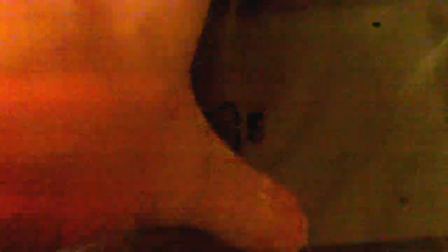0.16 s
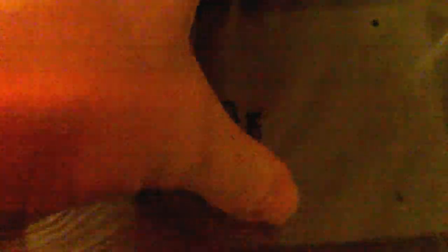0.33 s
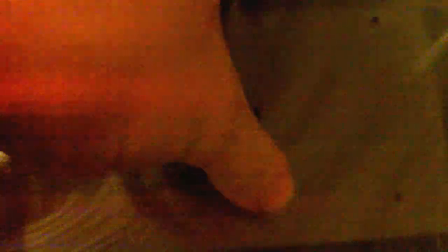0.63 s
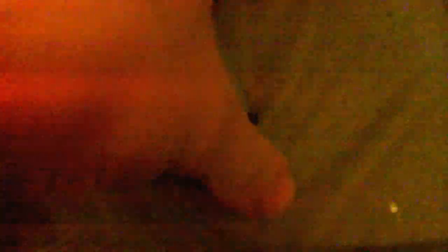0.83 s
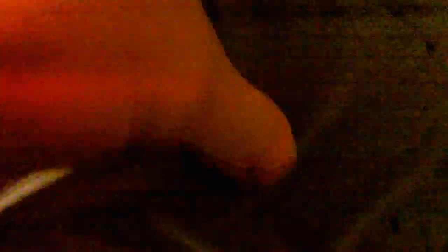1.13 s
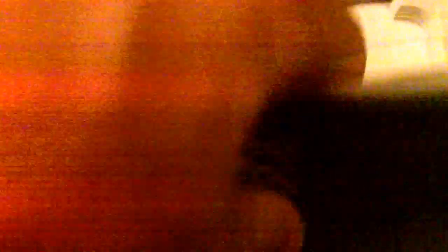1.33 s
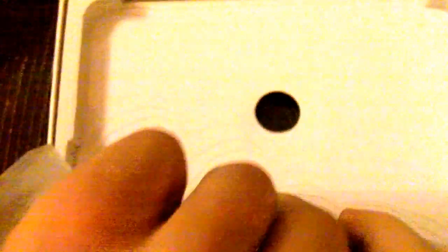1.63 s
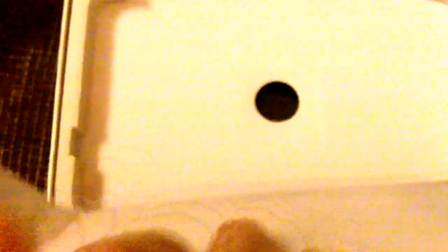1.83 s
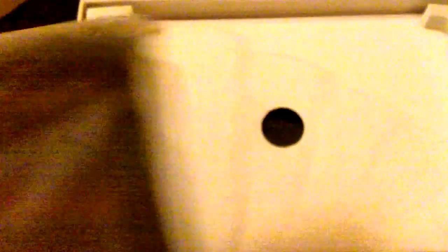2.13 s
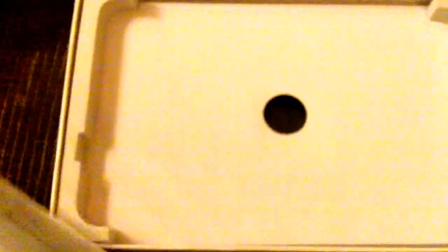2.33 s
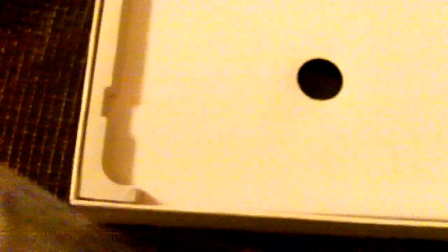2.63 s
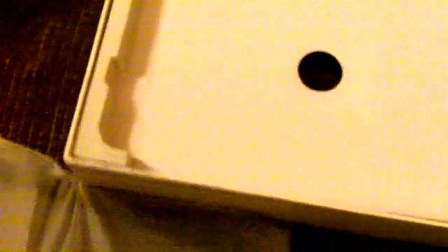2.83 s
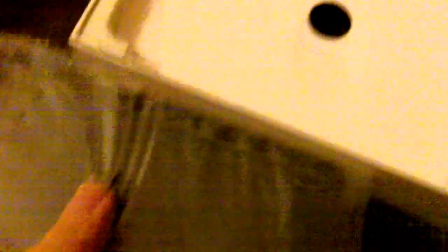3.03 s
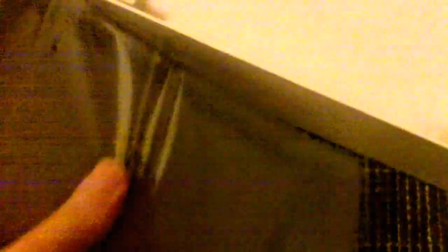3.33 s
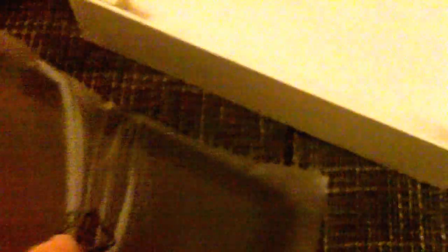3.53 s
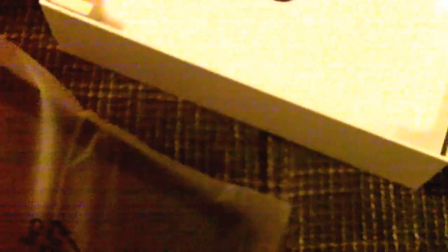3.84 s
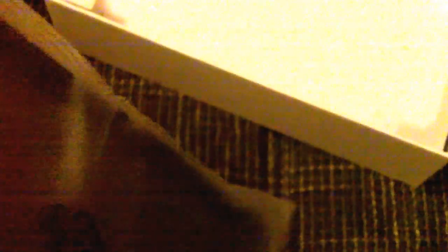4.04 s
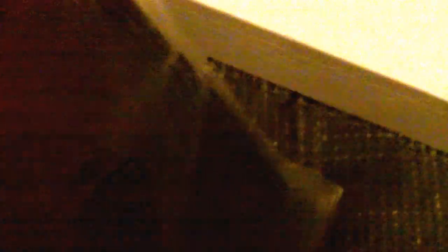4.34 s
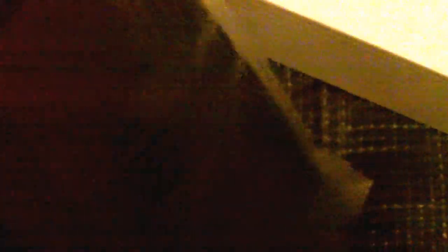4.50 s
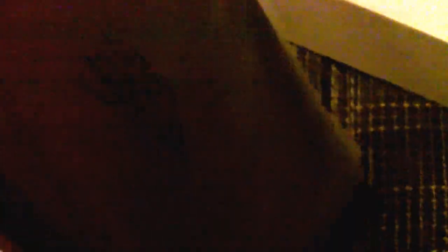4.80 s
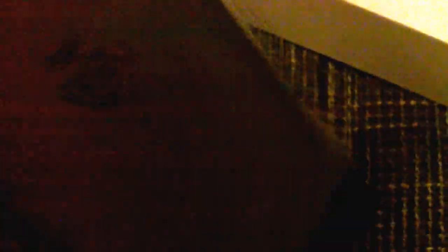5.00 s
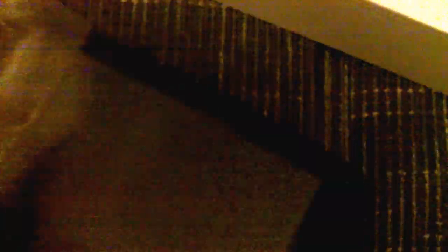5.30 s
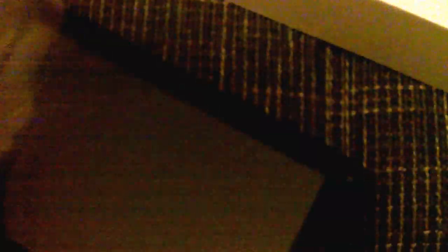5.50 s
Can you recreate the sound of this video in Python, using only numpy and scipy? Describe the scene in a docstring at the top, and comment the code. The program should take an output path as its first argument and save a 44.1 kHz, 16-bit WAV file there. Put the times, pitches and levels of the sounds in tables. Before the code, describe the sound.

Very close and dry in a quiet room, fingers rub a thin plastic sleeve with faint crackles. The rustling stays light until a cluster of hollow cardboard knocks near three seconds, with brighter film hiss. Softer crinkling follows, then a sudden much louder pull bursts with crackles, tiny squeaks, a thump and a low puff of air on the microphone.

```python
"""Quiet room, close microphone: hands lift a device in its thin plastic sleeve out of a card box.
Sliding film is noise plus sparse crinkles, shaped by stroke envelopes; creases are band-split noise cracks.
Knocks drive the damped modes of the box; squeaks are short gliding tones, most of them in a last quick pull.
Slow swings are air pushed at the microphone; behind lie room noise, a hum that soon fades and a faint whine."""
import sys
import numpy as np
from scipy import signal
from scipy.fft import rfft, irfft, next_fast_len
from scipy.io import wavfile
from scipy.ndimage import uniform_filter1d, map_coordinates

SR = 44100
rng = np.random.default_rng(int(sys.argv[2]) if len(sys.argv) > 2 else 0)


def to_wav(sig):
    """Store sig (one row per channel, or 1-D mono) as 16-bit WAV at the path in sys.argv[1].

    Samples outside -1..1 are clipped; the rate is SR.
    """
    pcm = np.clip(np.atleast_2d(sig), -1, 1) * 32767
    pcm = np.round(pcm).astype(np.int16)
    wavfile.write(sys.argv[1], SR, pcm.T)  # frames by channels


N = 249606  # samples

# strokes of the sleeve over device and card; hiss and drag relative to rub:
# start_s, attack_s, hold_s, release_s, rub_db, hiss_db, drag_db
STROKES = [(0.13, 0.064, .05, 0.094, -69.5, -1, 1), (0.234, .095, 0.0045, 0.066, -58, 2.5, -1),
           (0.369, 0.032, .01, 0.047, -64, -18, -2), (0.513, 0.028, .005, 0.052, -68.5, -5.5, 3),
           (0.607, 0.037, .01, 0.16, -64.5, -18, 1), (0.764, 0.04, 0.048, 0.24, -60, -1.5, -3.5),
           (1.004, 0.047, 0.033, 0.037, -61, 1.5, -2), (1.117, 0.0178, 0.011, 0.011, -57.5, 3.5, -12),
           (1.185, 0.069, 0.026, 0.032, -58.5, -1.5, -10), (1.29, 0.033, .015, 0.18, -60.5, -4.5, -2),
           (1.48, 0.051, .01, 0.18, -61.5, -13.5, -5.5), (1.598, 0.043, .005, 0.045, -52.5, -3, -21),
           (1.682, 0.18, 0.026, 0.032, -58.5, -1.5, -7), (1.882, 0.0367, .007, 0.0135, -62, 7, -4),
           (2.027, 0.031, .01, 0.23, -72, -13, -4), (2.272, 0.062, .005, 0.046, -61, -0.5, -6),
           (2.39, 0.028, 0.11, 0.043, -74.5, 2.5, -8), (2.654, 0.1, 0.091, 0.117, -62, -6, 1),
           (2.802, .05, 0.3, 0.16, -59.5, 2.5, -3), (2.988, .14, 0.08, 0.065, -48, 6.5, -5.5),
           (3.234, 0.03, 0.11, 0.14, -53, -1.5, -4.5), (3.527, 0.017, 0.0065, 0.056, -48.5, -4.5, -2),
           (3.628, 0.032, .01, 0.126, -60.5, 4.5, -5.5), (3.694, 0.041, .01, 0.2, -66.5, 14.5, -15),
           (3.803, .11, 0.0058, 0.17, -54.5, 4, -25.5), (3.949, .1, 0.026, 0.31, -59, 7.5, -24),
           (4.185, 0.055, .01, 0.044, -53.5, 0.5, -11), (4.333, 0.074, 0.015, 0.06, -66.5, 1.5, 2),
           (4.557, 0.077, 0.025, 0.042, -66.5, 6, 1), (4.715, 0.058, .01, 0.13, -59, 3, -7),
           (4.835, 0.077, 0.093, .05, -56.5, 5.5, 1.5), (5.09, 0.089, 0.023, 0.085, -68, 3.5, 6),
           (5.154, 0.13, 0.096, .1, -61.5, 8, -1), (5.303, 0.053, 0.016, 0.057, -41, 1.5, -2.5),
           (5.356, 0.055, 0.027, 0.03, -42.5, 8, -6), (5.423, 0.039, 0.0045, 0.032, -37, -4, 0),
           (5.551, 0.018, .005, 0.1, -49.5, -23, -1), (5.627, 0.014, .03, .05, -50, -6, -14)]
RELEASE_DB = 19  # fall over one release time
# light brushing between strokes: time_s, rub_db
BRUSH = [(0, -74.5), (.7, -83), (1.0, -70), (1.85, -68), (2.0, -79.5), (2.6, -81.5), (2.9, -65.5),
         (3.5, -64.5), (4.1, -64), (4.55, -67), (4.95, -74), (5.07, -73.5), (5.3, -64), (5.66, -65)]
BRUSH_HISS_DB, BRUSH_DRAG_DB = -0.5, -4  # relative to brushing rub
# fingertips gliding over the sleeve on the device: time_s, level_db
FINGERS = [(0, -69), (.14, -67), (.2, -85), (.27, -60), (.4, -72), (.48, -72.5), (.58, -71), (.66, -58),
           (.73, -77), (.84, -65), (.94, -57.5), (1.02, -72.5), (1.4, -81), (1.9, -93)]
# looseness of the film: time_s, crinkle_gain_db
SLACK = [(0, 4), (.7, -2), (1.2, -2), (2.85, 1), (3.13, -3), (3.4, -0.5), (4.3, -3), (5.2, -2.5), (5.4, 1)]
# hiss power moved into finer fizz by quick pulls: time_s, share_0_to_1
FIZZ_SHARE = [(0, 0.14), (.85, 0.2), (1.04, 0.36), (1.33, 0.55), (1.6, 0.32), (2.9, 0.3), (3.13, 0.66),
              (3.45, 0.84), (3.7, 0.4), (4.1, 0.26), (4.95, 0.88), (5.2, 0.36), (5.38, 0.42), (5.46, 0.7),
              (5.55, 0.26)]
# spectrum of gliding fingertips: freq_hz, relative_db_per_hz
SKIN_SPECTRUM = [(350, -16), (560, 2), (800, -5.5), (1150, 2.5), (1700, -5), (2600, -30)]
# spectrum of low drag: freq_hz, relative_db_per_hz
DRAG_SPECTRUM = [(50, -12.5), (110, 5), (250, -3.5), (550, -6), (800, -8.5), (1600, -38)]
# spectrum of mid-band rub: freq_hz, relative_db_per_hz
RUB_SPECTRUM = [(300, -23), (650, -0.5), (1200, 0.5), (2000, 0), (3000, -1.5), (4300, -0.5), (5500, -9),
                (7000, -1.5), (12000, -87)]
# spectrum of film hiss: freq_hz, relative_db_per_hz
HISS_SPECTRUM = [(3500, -17), (5400, -5), (6300, 4), (7400, 0), (9000, -27), (11000, -25), (13000, -32),
                 (15000, -28)]
# spectrum of fine fizz: freq_hz, relative_db_per_hz
FIZZ_SPECTRUM = [(5500, -16), (7200, 0), (8200, 0.5), (9400, -4.5), (11500, -12), (13500, -22),
                 (15000, -28)]
# big creases that snap; energy as 5 ms at this rms, before band trim:
# start_s, body_db, ring_db, tick_db, ring_hz
SNAPS = [(.026, -60, -51, -53.5, 3830), (.198, -58.5, -56.5, -58.5, 3770), (.2361, -57, -58, -64, 3420),
         (.282, -69, -53.5, -56, 2300), (.3256, -45, -35.5, -62, 4400), (.3294, -57, -45, -53, 4060),
         (.336, -73, -44.5, -58, 4040), (.4896, -62.5, -61, -57.5, 3760), (.593, -55, -48.5, -55, 3500),
         (.617, -64, -57.5, -59, 3280), (.6538, -64, -52, -56, 3450), (.839, -65, -44.5, -51, 4170),
         (.9708, -58, -49.5, -62.5, 2900), (1.318, -58, -71.5, -54.5, 2870),
         (1.4227, -63, -64, -55.5, 2200), (1.4561, -75, -54.5, -52, 3570), (1.4728, -66, -52, -55, 3120),
         (1.542, -76, -51, -47.5, 3660), (1.581, -55, -51.5, -66, 3660), (1.734, -76, -54.5, -51, 2720),
         (1.7921, -49.5, -45, -42, 2860), (1.8786, -53, -46.5, -52, 3270), (1.9972, -69, -54, -63, 2370),
         (2.108, -78, -68, -61, 2500), (2.3645, -72, -63, -59.5, 3500), (2.591, -63.5, -63.5, -64, 2540),
         (2.7205, -56, -62, -61, 2400), (2.857, -50, -48.5, -43.5, 3600), (2.9279, -73, -52, -47, 4000),
         (2.9635, -68.5, -43.5, -47, 4020), (3.0431, -52.5, -49.5, -49, 2530),
         (3.238, -45.5, -58, -42, 2200), (3.4755, -71, -72, -48, 3126), (3.5424, -49, -60, -66, 2300),
         (3.5892, -58, -53, -56, 3000), (3.762, -54, -50, -45.5, 4000), (3.7892, -76.5, -52, -52, 3900),
         (3.95, -63, -46.5, -49.5, 3380), (4.0886, -72, -48, -66.5, 3040), (4.1496, -51, -50.5, -55, 3700),
         (4.2055, -53.5, -46.5, -47, 2070), (4.4902, -55.5, -68, -56, 2190),
         (4.6408, -57.5, -58, -54.5, 3460), (4.8031, -53, -73.5, -65, 2700),
         (5.0987, -57.5, -60.5, -59, 3880), (5.3251, -40.5, -47, -56.5, 2450),
         (5.3384, -44.5, -40, -45, 2550), (5.416, -37.5, -39, -38, 3250), (5.4479, -58, -44, -36, 2800),
         (5.4703, -36.5, -47, -34.5, 2820), (5.5029, -50, -65, -50, 2300), (5.5733, -42, -53, -54, 2450)]
# small creases, relative to rub, before spread and band trim: body_db, ring_db, tick_db
CREASE_DB = [-4, 1.5, -1.5]
CREASES_PER_S, CREASE_SPREAD_DB = 15, 2.5  # mean rate, standard deviation
CREASE_MAX_RUB_DB = -52  # rub above this makes creases no louder
CREASE_HZ = 3240  # middle ring pitch
# blows on the box and rebounds; energy as 8.12 ms at this rms:
# start_s, level_db, softness_corner_hz, t60_s
KNOCKS = [(.003, -44, 1600, 0.0204), (0.376, -47.5, 1500, 0.02), (1.318, -56, 200, 0.063),
          (2.112, -53, 1040, 0.019), (2.592, -62.5, 600, 0.023), (2.8455, -33, 216, 0.056),
          (2.8454, -41, 1920, 0.029), (3.151, -31.5, 1580, 0.041), (3.166, -40.5, 710, 0.02),
          (3.262, -28.5, 520, 0.065), (3.272, -37, 800, 0.067), (3.282, -41, 905, 0.42),
          (3.339, -39.5, 1180, 0.1), (3.548, -43, 129, 0.0097), (5.462, -31.5, 167.6, 0.13),
          (5.466, -40, 2200, 0.047), (5.558, -38, 176, 0.022), (5.566, -45, 1750, 0.099)]
# modes of the card box: freq_hz, width_hz, gain_db
BOX_MODES = [(95, 75, -0.5), (222, 100, 3.5), (290, 146, 3), (377, 96, -0.5), (560, 214, -0.5),
             (768, 190, 0.5), (955, 174, -0.5), (1303, 94, 3), (1850, 1200, -10), (2260, 170, -12)]
# stick-slip of film; octave relative to fundamental:
# start_s, length_s, first_hz, last_hz, level_db, octave_db, pitch_unsteadiness_0_to_1
SQUEAKS = [(0.325, 0.016, 7480, 7000, -45.5, -36.5, 0.04), (1.134, 0.0186, 1910, 1956, -60, -4, 0.03),
           (1.661, 0.0013, 6470, 6050, -24.5, -46, 0.03), (3.713, 0.052, 1180, 3200, -57, 0, 0.2),
           (4.233, 0.015, 975, 785, -53, -15.5, 0.02), (5.34, 0.04, 2173, 2730, -37.5, -28, 0.05),
           (5.345, 0.014, 1366, 2140, -39.5, -11, 0.1), (5.377, 0.0227, 3010, 3300, -33, 14, 0.03),
           (5.399, 0.0243, 3512, 3930, -38, 2, 0.04), (5.433, 0.016, 8970, 8950, -34.5, -30, 0),
           (5.632, 0.029, 873, 1600, -47.5, -21, 0.2)]
# pushes of air at the microphone: start_s, peak_db, freq_hz, length_s
PUFFS = [(3.551, -20, 25, 0.055), (3.617, -34.5, 29, 0.0644), (5.4592, -10, 26, 0.067),
         (5.571, -23, 20.8, 0.0784)]
# spectrum of room noise: freq_hz, relative_db_per_hz
ROOM_SPECTRUM = [(10, -2.5), (20, -1.5), (33, -11), (54, -17), (128, -32.5), (357, -38.5), (600, -45.5),
                 (2850, -52.5), (4100, -70), (6700, -61), (12000, -58), (13400, -65), (15000, -88)]
HUM_HZ, HUM_DB, HUM_FADE_START_S, HUM_FADE_DB_PER_S = 71, -58, .8, 130
WHINE_START_HZ, WHINE_RISE_HZ_PER_S, WHINE_WOBBLE_HZ, WHINE_DB = 10100, 150, 70, -84.5
# spectrum of each channel's electronic noise: freq_hz, relative_db_per_hz
CIRCUIT_SPECTRUM = [(20, 2), (60, -0.5), (150, -13), (400, -20.5), (1000, -30), (4000, -49.5), (7000, -44),
                    (12000, -32.5), (15000, -40.5)]
TOP_HZ = 15300  # band limit


def amp(db):
    """Decibels to gain."""
    return 10 ** (np.asarray(db) / 20)


def unit(x):
    """x at rms 1."""
    return x / np.sqrt(np.mean(x ** 2) + 1e-20)


def clock(length_s):
    """Sample times of a stretch, s."""
    return np.arange(int(length_s * SR)) / SR


def curves(rows):
    """Each column after the time, interpolated to one value per sample."""
    time_s, *columns = np.transpose(rows)
    return [np.interp(np.arange(N) / SR, time_s, column) for column in columns]


def wobble(knots_per_s):
    """Smooth random curve."""
    knots = rng.standard_normal(int(N * knots_per_s / SR) + 4)
    return map_coordinates(knots, [np.arange(N) * knots_per_s / SR])


def filtered(x, response):
    """x times a complex response of frequency, zero-padded."""
    size = next_fast_len(len(x) + 8192)
    spectrum = rfft(x, size) * response(np.fft.rfftfreq(size, 1 / SR))
    return irfft(spectrum, size)[:len(x)]


def coloured(x, spectrum):
    """x shaped by (Hz, dB) points on a log frequency axis, at rms 1."""
    hz, db = np.transpose(spectrum)
    return unit(filtered(x, lambda f: amp(np.interp(np.log(f + 1), np.log(hz), db))))


def resonance(f, hz, width_hz):
    """Response of one damped mode, 1 at its centre."""
    return 1j * f * width_hz / (hz * hz - f * f + 1j * f * width_hz)


def burst(x, length_s):
    """x with the energy of an rms-1 sound of that length."""
    return x * np.sqrt(length_s * SR / np.sum(x ** 2))


def add(track, start_s, sound):
    """Mix a sound into the track, cut at its end."""
    target = track[max(0, round(start_s * SR)):][:len(sound)]
    target += sound[:len(target)]


def contact():
    """Rub, hiss and drag levels, dB: strokes swell, hold and die away, power-summed with the brushing."""
    t = np.arange(N) / SR
    brush_db, = curves(BRUSH)
    power = amp(brush_db + np.array([[0], [BRUSH_HISS_DB], [BRUSH_DRAG_DB]])) ** 2
    for start_s, attack_s, hold_s, release_s, rub_db, hiss_db, drag_db in STROKES:
        swell = np.sin(np.pi / 2 * np.clip((t - start_s) / attack_s, 0, 1)) ** 2
        fade_db = RELEASE_DB * np.maximum(t - start_s - attack_s - hold_s, 0) / release_s
        envelope = swell * amp(-np.minimum(fade_db, 100))
        layer_gains = amp(rub_db + np.array([[0], [hiss_db], [drag_db]]))
        power += (layer_gains * envelope) ** 2
    return 10 * np.log10(power)


def grains(rate_per_s, spread_db):
    """Tiny slips at random moments, a few much stronger than the rest, at rms 1."""
    sizes = amp(spread_db * np.minimum(rng.exponential(size=N), 4))
    happens = rng.random(N) < rate_per_s / SR
    return unit(happens * sizes * rng.choice([-1, 1], N))


def patchy(x, depth_db, bin_size=5, frame_size=12):
    """x with peaks and valleys of colour that come and go as the sheet changes shape."""
    z = signal.stft(x, nperseg=512)[2]
    across_bins = uniform_filter1d(rng.standard_normal(z.shape), bin_size, 0)
    field = uniform_filter1d(across_bins, frame_size, 1)
    return unit(signal.istft(z * amp(depth_db * unit(field)))[1][:N])


def sliding(rub_db, hiss_db, drag_db):
    """Friction as a dense stream of micro-slips; sparser crinkles sound in all layers at once."""
    finger_db, = curves(FINGERS)
    slack_db, = curves(SLACK)
    share = np.clip(curves(FIZZ_SHARE)[0], 0, 1)
    crinkle = amp(slack_db) * grains(rate_per_s=520, spread_db=5.0)
    grip_db = 2.0 * wobble(90)  # grip tightens and eases

    def friction(spectrum, crinkle_db, patchy_db):
        """One layer of patchy noise and shared crinkles, at rms 1."""
        slips = patchy(rng.standard_normal(N), patchy_db)
        return coloured(slips + amp(crinkle_db) * crinkle, spectrum)

    skin = amp(finger_db + grip_db) * friction(SKIN_SPECTRUM, crinkle_db=-17, patchy_db=4.0)
    drag = amp(drag_db) * friction(DRAG_SPECTRUM, crinkle_db=-5, patchy_db=3.0)
    rub = amp(rub_db + grip_db) * friction(RUB_SPECTRUM, crinkle_db=-6.0, patchy_db=2.0)
    hiss = np.sqrt(1 - share) * friction(HISS_SPECTRUM, crinkle_db=-2.0, patchy_db=4.5)
    fizz = np.sqrt(share) * friction(FIZZ_SPECTRUM, crinkle_db=-9.0, patchy_db=1.2)
    treble_gain = amp(hiss_db + 0.68 * grip_db - 1.0)
    return skin + drag + rub + treble_gain * (hiss + fizz)


def small_creases(rub_db, count=200):
    """Creases give way at random moments, stronger where film rubs harder; rows as in SNAPS."""
    chance, scatter = rng.random((count, 2)), rng.standard_normal((count, 4))
    start_s = chance[:, 0] * N / SR
    local_db = np.minimum(rub_db[(chance[:, 0] * N).astype(int)], CREASE_MAX_RUB_DB)
    levels_db = local_db[:, None] + CREASE_DB + CREASE_SPREAD_DB * scatter[:, 1:]
    ring_hz = CREASE_HZ * 2 ** (.5 * np.tanh(scatter[:, 0]))  # within half an octave
    rows = np.column_stack([start_s, levels_db, ring_hz])
    return list(rows[chance[:, 1] < CREASES_PER_S * N / SR / count])


def snaps(creases, t60_s=0.0035, tail_db=-24, tail_t60_s=0.055, ring_spread=1.42):
    """A buckling crease cracks once: sheet gives body, crease rings in its own band, edge ticks."""
    out, t = np.zeros(N), clock(0.044)
    for start_s, *levels_db, ring_hz in creases:
        decay = amp(-60 * t / t60_s) + amp(tail_db - 60 * t / tail_t60_s)
        crack = rng.standard_normal(len(t)) * decay
        crack[0] += 4 * rng.choice([-1, 1])
        bands_hz = [(500, 1900), (ring_hz / ring_spread, ring_hz * ring_spread), (5900, 9200)]
        for edges_hz, db, trim_db in zip(bands_hz, levels_db, [.3, .6, 1.2]):
            band = signal.butter(3, edges_hz, "band", fs=SR, output="sos")
            part = signal.sosfilt(band, crack)
            add(out, start_s, amp(db + trim_db) * burst(part, .005))
    return out


def box(f):
    """Response of the card box: damped modes of alternating sign."""
    return sum((-1) ** k * amp(db) * resonance(f, hz, width_hz)
               for k, (hz, width_hz, db) in enumerate(BOX_MODES))


def knocks(chatter=0.045):
    """Device strikes the box and chatters on it; a softer blow low-passes the force on the modes."""
    out, t = np.zeros(N), clock(.2)
    for start_s, db, soft_hz, t60_s in KNOCKS:
        force = chatter * rng.standard_normal(len(t)) * amp(-60 * t / t60_s)
        force[0] += 1
        ring = filtered(force, lambda f: box(f) / (1 + 1j * np.sqrt(2) * f / soft_hz - (f / soft_hz) ** 2))
        add(out, start_s, amp(db) * burst(ring, 0.00812))
    return out


def squeaks():
    """Stick-slip of the film: short unsteady gliding tones with an octave."""
    out = np.zeros(N)
    for start_s, length_s, first_hz, last_hz, db, octave_db, jitter in SQUEAKS:
        u = clock(length_s) / length_s
        glide_hz = first_hz + (last_hz - first_hz) * u
        hz = glide_hz * (1 + jitter * wobble(774)[:len(u)])
        phase = 2 * np.pi * np.cumsum(hz) / SR
        swell = np.sqrt(np.abs(np.sin(np.pi * u))) * amp(1.0 * wobble(460)[:len(u)])
        tone = np.sin(phase) + amp(octave_db) * np.sin(2 * phase)
        add(out, start_s, amp(db) * unit(swell * tone))
    return out


def puffs():
    """Air pushed by the moving packet swings the microphone through one to two slow cycles."""
    out = np.zeros(N)
    for start_s, db, hz, length_s in PUFFS:
        t = clock(length_s)
        swing = np.cos(2 * np.pi * hz * (t - length_s / 2))
        add(out, start_s, amp(db) * np.sin(np.pi * t / length_s) * swing)
    return out


def background():
    """Room rumble and hiss as shaped noise, a low hum that soon fades, a faint rising whine."""
    t = np.arange(N) / SR
    room = amp(-46.5) * coloured(rng.standard_normal(N), ROOM_SPECTRUM)
    hum_db = HUM_DB - HUM_FADE_DB_PER_S * np.maximum(t - HUM_FADE_START_S, 0)
    hum = amp(hum_db) * unit(np.sin(2 * np.pi * HUM_HZ * t))
    whine_hz = WHINE_START_HZ + WHINE_RISE_HZ_PER_S * t + WHINE_WOBBLE_HZ * wobble(500)
    whine = amp(WHINE_DB) * unit(np.sin(2 * np.pi * np.cumsum(whine_hz) / SR))
    return room + hum + whine


def scene():
    """All sources close and dry, alike in both channels."""
    rub_db, hiss_db, drag_db = contact()
    mono = sliding(rub_db, hiss_db, drag_db)
    mono = mono + snaps(SNAPS + small_creases(rub_db))
    mono = mono + knocks() + squeaks() + puffs() + background()
    return np.array([mono, mono])


def record(dry, notch_hz=5480, notch_width_hz=900):
    """Own faint noise and steady offset per channel; a deep treble notch and a steep band limit."""
    response = lambda f: (1 - resonance(f, notch_hz, notch_width_hz)) * (f < TOP_HZ)
    offset = [[.0045], [.0222]]  # full scale = 1
    noisy = [channel + amp(-66.0) * coloured(rng.standard_normal(N), CIRCUIT_SPECTRUM) for channel in dry]
    return np.array([filtered(channel, response) for channel in noisy]) + offset


dry = scene()
out = record(dry)
to_wav(out)
```